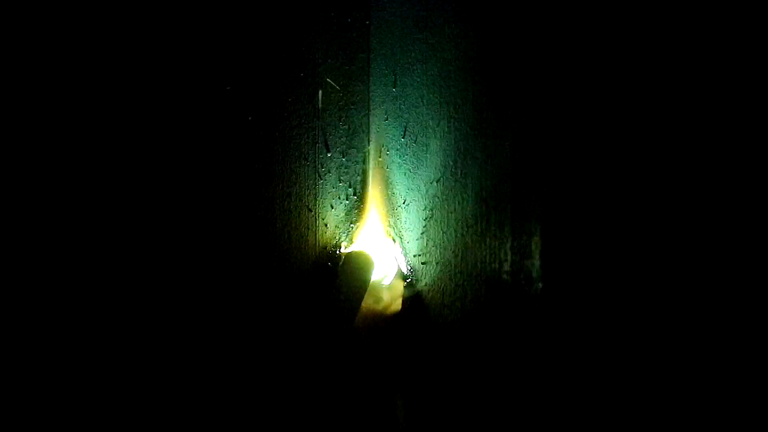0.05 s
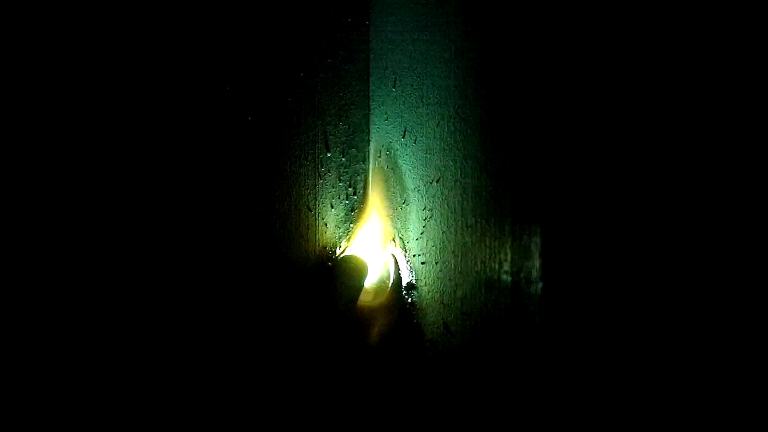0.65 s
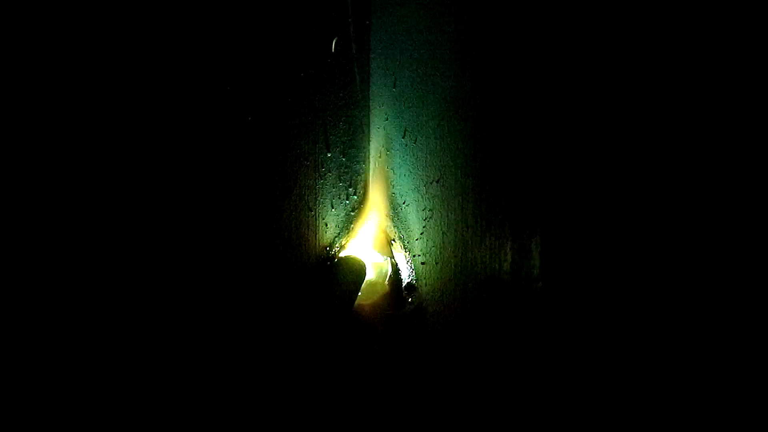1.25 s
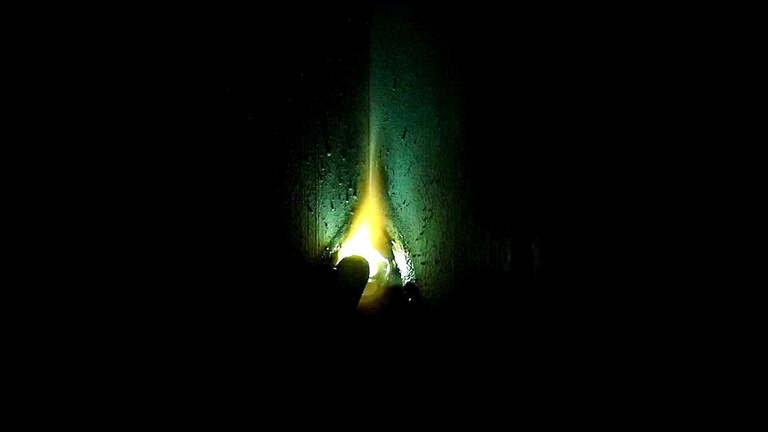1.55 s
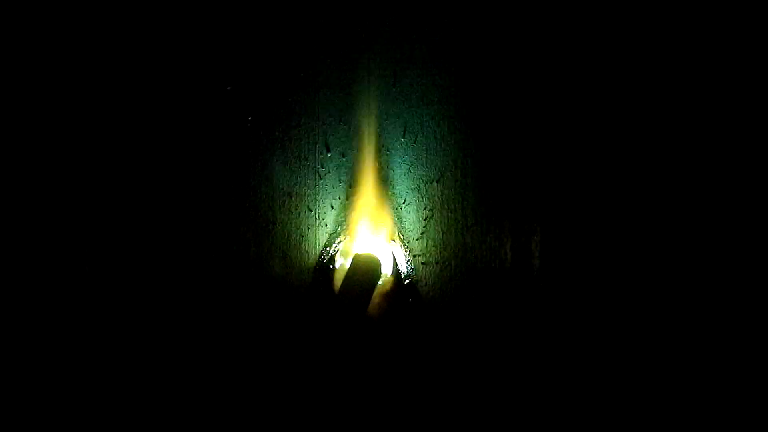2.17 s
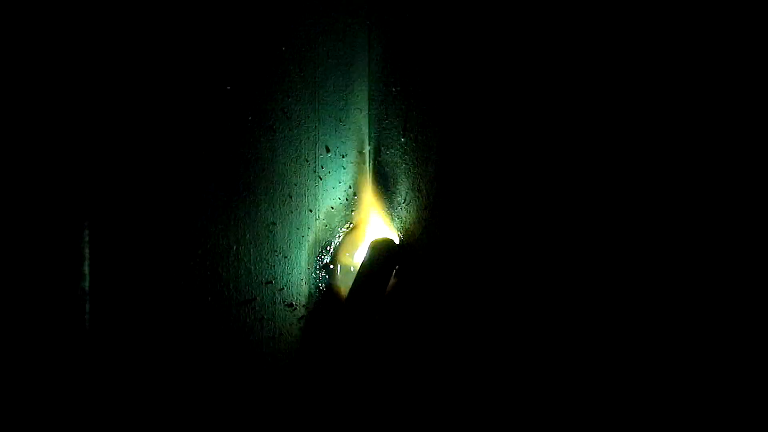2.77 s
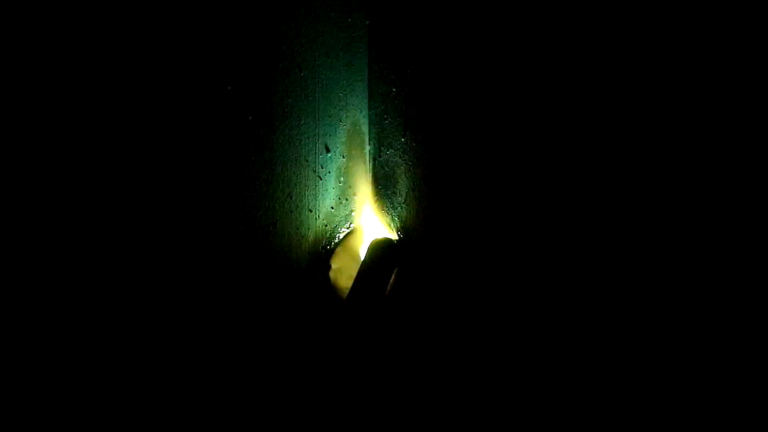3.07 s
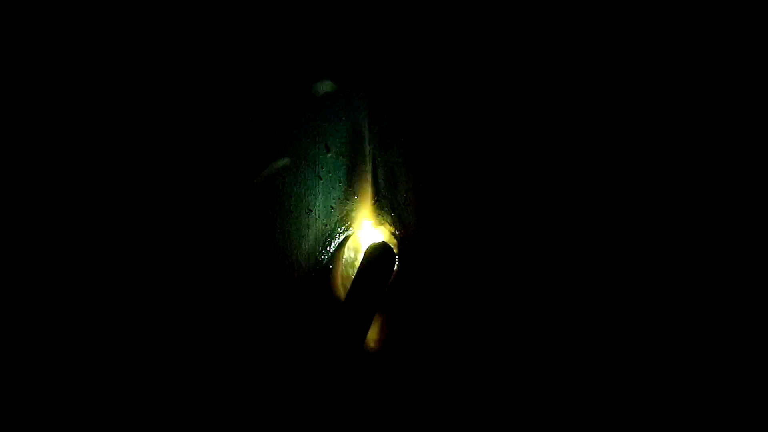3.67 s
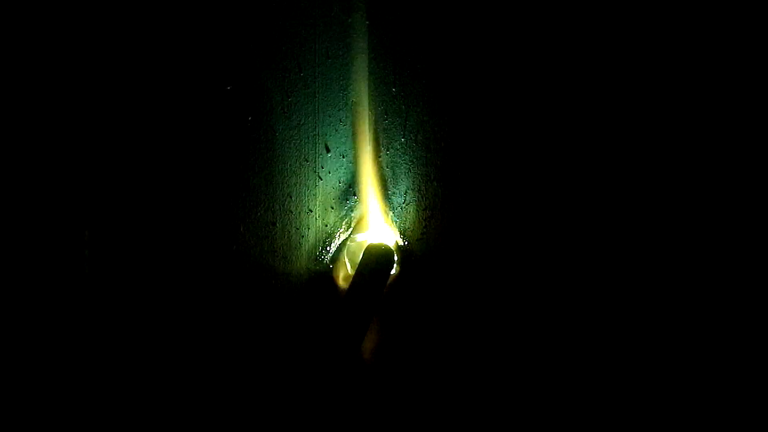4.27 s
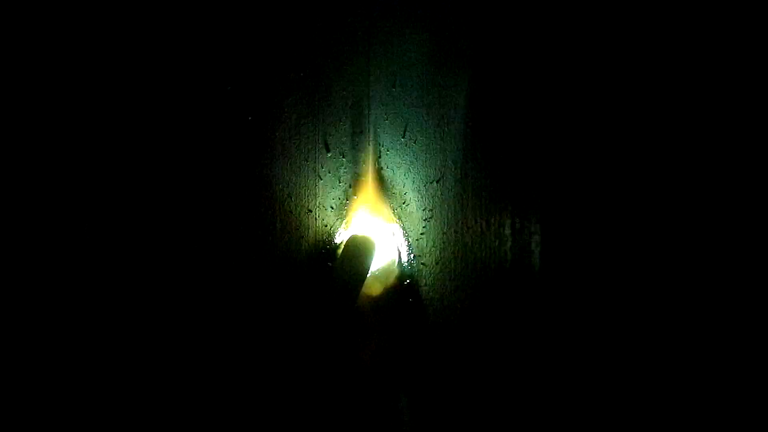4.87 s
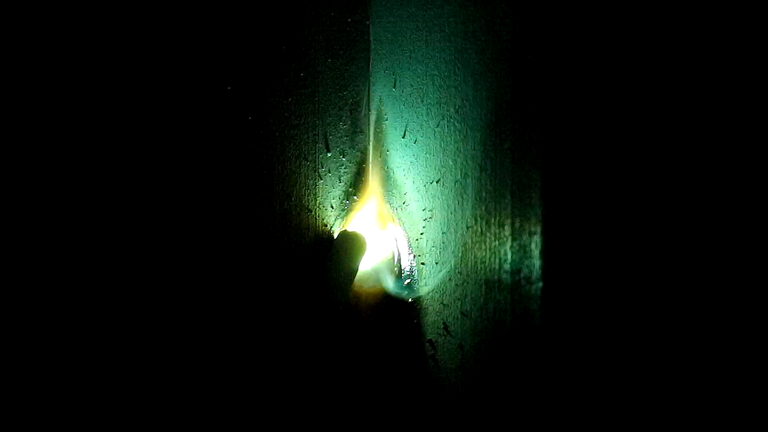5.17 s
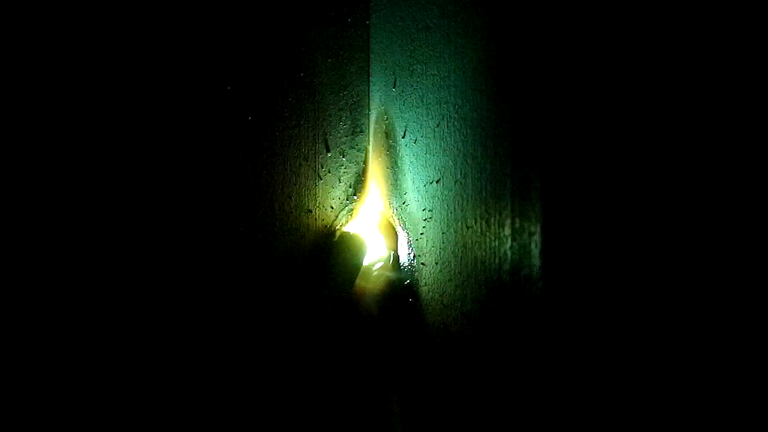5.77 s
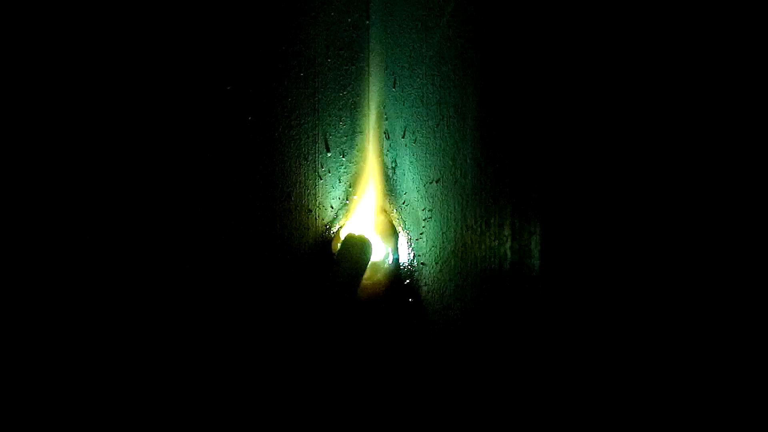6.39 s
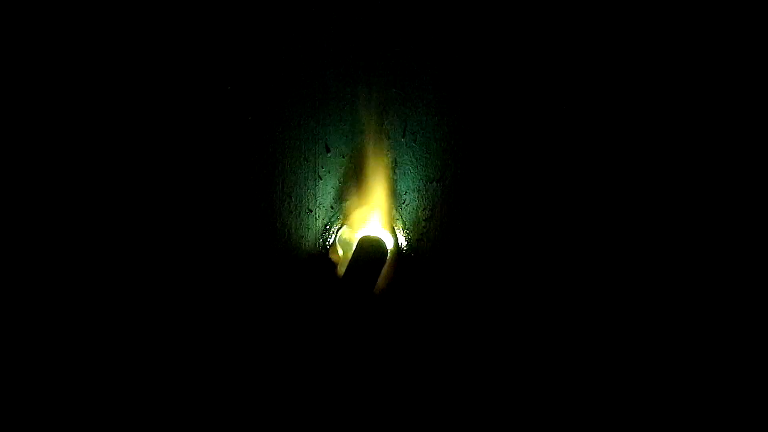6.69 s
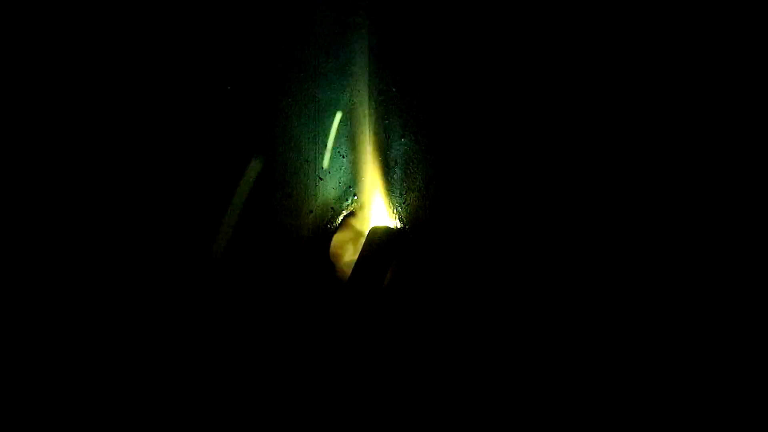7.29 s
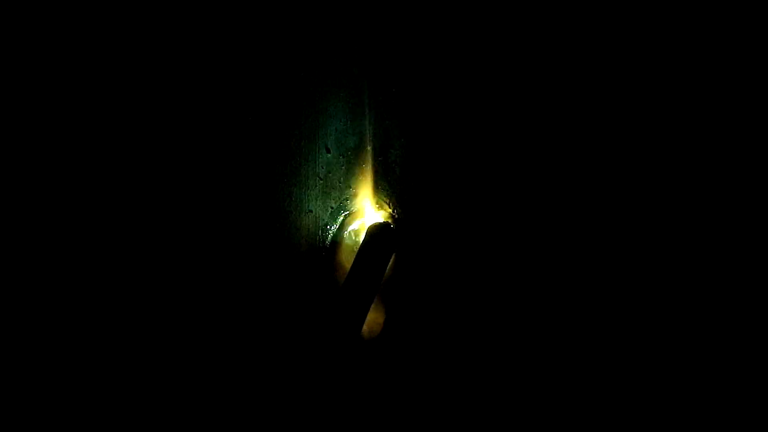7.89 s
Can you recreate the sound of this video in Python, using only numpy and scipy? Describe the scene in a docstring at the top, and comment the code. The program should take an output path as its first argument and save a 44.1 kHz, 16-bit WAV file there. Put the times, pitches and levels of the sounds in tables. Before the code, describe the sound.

Close, nearly dry workshop sound of an electric arc welding steel. A bright, grainy hiss runs without stopping, packed with quick uneven cracks, fizzing and tiny spatter clicks, with a wavering flame rumble underneath. A couple of soft pops lead to one loud pop, after which hiss and flutter sink for an instant. The crackling carries on with a few weaker pops and a last swell of flame.

```python
"""A stick welder runs a bead along a steel seam, close by, in a workshop.
From the start the arc hisses and its flame flutters; some ten times a second a drop of metal bridges
the gap, fizzes and snaps, while spatter ticks around the seam. From 1.6 s on, gas now and then bursts
from the molten pool with a dull pop. After the biggest pop, at 3.1 s, hiss and flutter duck briefly,
then return. Smaller pops follow, and the flame flares up again just before the end."""
import sys
import numpy as np
from scipy import signal
from scipy.fft import rfft, irfft
from scipy.io import wavfile
from scipy.ndimage import uniform_filter1d

SR = 44100
rng = np.random.default_rng(int(sys.argv[2]) if len(sys.argv) > 2 else 0)


def inscribe(sig):
    """Save sig as 16-bit PCM at rate SR to the path in sys.argv[1].

    A 1-D sig is mono; a 2-D sig holds one channel per row.
    Samples are clipped to [-1, 1] before scaling.
    """
    pcm = np.round(np.clip(np.atleast_2d(sig).T, -1, 1) * 32767)
    wavfile.write(sys.argv[1], SR, pcm.astype(np.int16))


N = 350154
TIME_S = np.arange(N) / SR
BAND_EDGE_HZ = 15850


# Drops crossing the arc. Each row: time in seconds, crack level in dB, crack length in seconds,
# level in dB that the arc builds towards before the drop.
DROPS = [(0.0858, -22, 0.0005, -42), (0.1786, -23, 0.0055, -28.5), (0.3369, -24, 0.0045, -35.5),
         (0.5135, -21, 0.0054, -34.5), (0.6487, -13, 0.0011, -36), (0.7338, -17, 0.0008, -37),
         (0.745, -23, 0.005, -31), (0.8639, -18, 0.0025, -38), (0.9154, -24, 0.0055, -39),
         (0.9887, -27, 0.004, -36.5), (1.0752, -18, 0.0017, -38.5), (1.227, -23, 0.0055, -33.5),
         (1.3518, -18, 0.0014, -38), (1.382, -25, 0.005, -34), (1.4583, -20, 0.002, -35),
         (1.5696, -12, 0.0006, -37.5), (1.6393, -15, 0.0018, -35.5), (1.7228, -16, 0.002, -32.5),
         (1.8073, -24, 0.0013, -37.5), (1.8782, -20, 0.0013, -31), (2.092, -29, 0.005, -35.5),
         (2.1537, -18, 0.0018, -34), (2.2901, -19, 0.0021, -35), (2.313, -29, 0.004, -33),
         (2.3995, -18, 0.002, -38.5), (2.5859, -16, 0.0016, -37.5), (2.6622, -24, 0.0027, -36),
         (2.7228, -21, 0.0029, -32), (2.755, -26, 0.005, -30), (2.8307, -21, 0.0019, -40),
         (3.048, -24, 0.005, -36.5), (3.1323, -9.5, 0.001, -35), (3.246, -19.5, 0.0004, -45),
         (3.263, -26, 0.002, -44), (3.3916, -12.5, 0.0011, -38.5), (3.594, -21, 0.0024, -35.5),
         (3.6443, -25, 0.0055, -30), (3.7796, -18, 0.0013, -37.5), (3.8603, -19.5, 0.002, -37.5),
         (3.892, -26.5, 0.005, -39), (4.0245, -16, 0.001, -41), (4.0715, -23, 0.004, -32.5),
         (4.1401, -18, 0.0008, -40.5), (4.2089, -16, 0.0019, -35), (4.2945, -19, 0.0016, -38.5),
         (4.3758, -9, 0.0006, -41), (4.526, -22, 0.0029, -35.5), (4.5817, -16, 0.0015, -31),
         (4.673, -11.5, 0.0008, -36), (4.7785, -16.5, 0.0016, -34.5), (4.898, -27, 0.005, -34),
         (5.0005, -14.5, 0.0016, -37.5), (5.0852, -16, 0.0005, -34), (5.2099, -21, 0.002, -36.5),
         (5.2322, -22, 0.0033, -35), (5.312, -25.5, 0.005, -34.5), (5.3649, -22, 0.0053, -30),
         (5.5529, -17, 0.004, -35), (5.6346, -21, 0.0019, -36.5), (5.7586, -15, 0.0007, -34.5),
         (5.767, -22, 0.005, -32), (5.8197, -21, 0.002, -33.5), (5.882, -14, 0.0015, -40.5),
         (6.0177, -21, 0.0055, -37.5), (6.1653, -15, 0.0016, -37), (6.2467, -18, 0.0011, -36),
         (6.295, -27, 0.0055, -35), (6.3201, -26, 0.004, -35), (6.4507, -17, 0.0014, -41),
         (6.554, -19, 0.002, -35.5), (6.6064, -17, 0.0017, -34), (6.7259, -14.5, 0.0018, -40),
         (6.781, -26, 0.003, -37), (6.832, -17, 0.0007, -38), (6.96, -28, 0.005, -39.5),
         (7.0186, -20, 0.0028, -31.5), (7.1297, -19, 0.002, -36), (7.195, -27, 0.005, -37),
         (7.319, -20, 0.0022, -37.5), (7.3935, -18, 0.0018, -34), (7.5882, -23, 0.0045, -37.5),
         (7.7279, -13, 0.0005, -36), (7.9128, -22, 0.004, -34)]

def arc_level_db(idle_db=-58, sag_share=0.38, settle_s=0.008, touch_db=2, touch_s=0.01, duck_db=8):
    """The arc builds while a drop grows, swells as it touches the pool and sags once it is gone."""
    drop_s, _, length_s, top_db = np.transpose(DROPS)
    growing, sag = drop_cycle()
    built_db = top_db[growing] + sag_share * sag * (idle_db - top_db[growing])
    built_db = uniform_filter1d(built_db, int(settle_s * SR))
    nearest = np.searchsorted((drop_s[1:] + drop_s[:-1]) / 2, TIME_S)
    slowness = length_s[nearest] / np.median(length_s)
    swell_db = touch_db * np.sqrt(slowness) * bump(drop_s[nearest], touch_s)
    return built_db + swell_db - duck_db * duck()


def drop_cycle(regrow_s=0.072):
    """Per sample: row of the growing drop, and the sag (1 to 0) left by the one before."""
    drop_s = np.array(DROPS)[:, 0]
    growing = np.searchsorted(drop_s, TIME_S)
    age_s = TIME_S - np.r_[0, drop_s][growing]
    return np.minimum(growing, len(drop_s) - 1), np.exp(-(age_s / regrow_s) ** 2)


# Arc hiss. Each row: frequency in Hz, relative level in dB.
HISS_SPECTRUM = [(80, -59.5), (400, -6), (1200, -9), (2800, -8.5), (4600, -8.5), (9000, -21.5),
                 (15500, -16.5)]

def hiss(arc_db, gain_db=5, spurt_db=1.5, swell_db=1.17, grain_db=0.77, detune=0.013):
    """The burning arc surges and breaks off, grainy from tiny sparks; its sway shifts the resonances."""
    surge_db = spurt_db * surges(per_s=52, build_s=0.011) + swell_db * surges(per_s=7.7, build_s=0.058)
    envelope = gain_of(arc_db + gain_db + surge_db + grain_db * wander(rate_hz=1500))
    sway = (1 + np.tanh(2 * wander(rate_hz=5))) / 2
    higher = radiate(envelope * np.sqrt(sway), HISS_SPECTRUM, 1 + detune)
    lower = radiate(envelope * np.sqrt(1 - sway), HISS_SPECTRUM, 1 - detune)
    return higher + lower


# A drop's crack and fizz. Each row: frequency in Hz, relative level in dB.
CRACK_SPECTRUM = [(100, -7), (500, -3.5), (1200, -6), (2800, -7), (4600, 6), (9000, -5), (15500, 6.5)]
FIZZ_SPECTRUM = [(100, -43), (1200, -14.5), (4000, -19.5), (9000, -21), (15500, -25.5)]

def crackle(arc_db, crack_db=-0.9, fizz_db=-10, fry_db=-14.5, sizzle_db=-44, sputter_db=2, grain_db=1.3):
    """A drop fizzes as its neck thins, cracks as it blows, then fries; spatter spits as it lands."""
    fizz_rise_s, fizz_fade_s, fry_s, spit_s = 0.008, 0.002, 0.009, 0.0007
    crack_power, fizz_power, fry_power = np.zeros((3, N))
    median_length_s = np.median(np.array(DROPS)[:, 2])
    spits = [(at_s, level_db, spit_s) for at_s, level_db in TICKS]
    for at_s, level_db, length_s, *_ in list(DROPS) + spits:
        near = slice(int((at_s - 0.05) * SR), int((at_s + 0.05) * SR))
        before_s, after_s = np.maximum(at_s - TIME_S[near], 0), np.maximum(TIME_S[near] - at_s, 0)
        rise_s = 0.65 * length_s
        crack = gain_of(level_db + crack_db) * np.exp(-(before_s / rise_s) ** 2 - after_s / length_s)
        fizz = gain_of(level_db + fizz_db) * np.exp(-before_s / fizz_rise_s - after_s / fizz_fade_s)
        fry = gain_of(level_db + fry_db) * np.exp(-after_s / fry_s) * (after_s > 0)
        slowness = length_s / median_length_s
        crack_power[near] += crack ** 2
        fizz_power[near] += min(slowness, slowness ** 2) * fizz ** 2
        fry_power[near] += min(slowness, 1) * fry ** 2
    # Between drops a sizzle follows the arc's strength.
    fizz_power += gain_of(sizzle_db + 0.91 * (arc_db - arc_db.mean())) ** 2
    grain = unit_rms(gain_of(grain_db * wander(rate_hz=5000)))
    sputter = unit_rms(gain_of(sputter_db * wander(rate_hz=350)))
    cracks = radiate(np.sqrt(crack_power + fry_power * sputter ** 2) * grain, CRACK_SPECTRUM)
    return cracks + radiate(np.sqrt(fizz_power) * sputter * grain, FIZZ_SPECTRUM)


# Spatter landing. Each row: time in seconds, level in dB.
TICKS = [(0.6535, -15), (1.567, -19), (2.409, -15), (3.1305, -12), (3.386, -17.5), (4.1462, -20),
         (5.091, -19), (6.1602, -16), (6.171, -14), (6.2522, -18.5), (6.7477, -19), (6.8399, -17),
         (7.3267, -19), (7.9019, -16)]
# One tick. Each row: frequency in Hz, relative level in dB.
TICK_SPECTRUM = [(100, -28), (1200, -7), (2800, -8), (5000, 8), (9000, -1), (12500, -6), (15500, 1)]

def spatter(arc_db, snap_db=4, tick_db=7, spark_db=2, sparks_per_s=170, size=512):
    """Dry clicks, each with its own colour: the snap of a short crack, landing spatter, tiny sparks."""
    spread_db, variety_db, sharp_s = 2.5, 3, 0.001
    spark_at = np.flatnonzero(rng.random(N) < sparks_per_s / SR)
    excess_db = spread_db * np.minimum(rng.exponential(1, len(spark_at)), 2)
    sparks = list(zip(spark_at / SR, arc_db[spark_at] + spark_db + excess_db))
    snaps = [(at_s, level_db + snap_db - 10 * np.log10(1 + (length_s / sharp_s) ** 2))
             for at_s, level_db, length_s, _ in DROPS]
    ticks = [(at_s, level_db + tick_db) for at_s, level_db in TICKS]
    events = snaps + ticks + sparks
    hz = np.fft.rfftfreq(size, 1 / SR)
    # Three random colours per click: left, right, shared.
    colours = unit_rms(uniform_filter1d(rng.standard_normal((len(events), 3, len(hz))), size=12))
    colour_db = variety_db * (colours[:, :2] + colours[:, 2:]) / np.sqrt(2)
    clicks = irfft(minimum_phase(at_hz(TICK_SPECTRUM, hz) + resonances_db(hz) + colour_db))
    track = np.zeros((2, N + size))
    for (at_s, level_db), click in zip(events, clicks):
        start = int(at_s * SR)
        track[:, start:start + size] += gain_of(level_db) * unit_rms(click) / np.sqrt(size)
    return track[:, :N]


# Gas bursts. Each row: start in seconds, level in dB, push length in seconds, thud cutoff in Hz.
POPS = [(1.638, -19.5, 0.00089, 2600), (2.4093, -12, 0.00051, 2600), (2.4147, -16, 0.00046, 2200),
        (3.1354, 3, 0.00046, 2530), (3.16, -18, 0.00035, 2400), (3.1651, -5, 0.00044, 750),
        (3.171, -18, 0.00024, 1400), (5, -12, 0.00034, 2000), (5.551, -21.5, 0.0018, 2000),
        (6.16, -25, 0.00099, 2200)]
# The pool's burble. Each row: frequency in Hz, relative level in dB.
BURBLE_SPECTRUM = [(60, -11), (300, -6), (700, -11), (1700, -7.5), (3200, -23), (12000, -28)]

def pops(highpass_hz=65, spray_db=-25, spray_s=0.0074, burble_db=-20, burble_s=0.0086):
    """Gas bursts with a hard push and a longer suck; the pool burbles. Sharper pops spray more metal."""
    blast, spray, burble = np.zeros((3, N))
    dullest_hz, sharpest_hz = np.sort(np.array(POPS)[:, 3])[[0, -1]]
    for start_s, level_db, push_s, cutoff_hz in POPS:
        near = slice(int(start_s * SR), int(start_s * SR) + SR // 10)
        t = TIME_S[near] - TIME_S[near][0]
        level = gain_of(level_db)
        pressure = level * (1 - t / push_s) * np.exp(-t / push_s)
        blast[near] += signal.lfilter(*signal.butter(2, cutoff_hz, fs=SR), pressure)
        spray[near] += level * gain_of(spray_db) * cutoff_hz / sharpest_hz * np.exp(-t / spray_s)
        dullness = np.sqrt(dullest_hz / cutoff_hz)
        burble[near] += level * gain_of(burble_db) * dullness * np.exp(-t / burble_s)
    thud = signal.sosfilt(signal.butter(2, highpass_hz, "high", fs=SR, output="sos"), blast)
    return thud + radiate(spray, HISS_SPECTRUM) + radiate(burble, BURBLE_SPECTRUM)


def duck(delay_s=0.061, half_s=0.015, growth=0.46):
    """How far hiss and flutter dip just after a pop (1 for a 0 dB pop); the deepest dip counts."""
    dips = [gain_of(growth * level_db) * bump(at_s + delay_s, half_s) for at_s, level_db, *_ in POPS]
    return np.max(dips, axis=0)


# Slow drift of the flame. Each row: time in seconds, level in dB.
FLAME_DRIFT = [(0.0, -47), (0.3, -43.5), (0.75, -48), (1.3, -39), (1.7, -45), (2.1, -44.5), (2.5, -46.5),
               (3.0, -38.5), (3.5, -46.5), (3.95, -51), (4.55, -44.5), (5.2, -38.5), (5.7, -48.5),
               (6.35, -45.5), (6.8, -42.5), (7.55, -39.5), (7.8, -37.5), (7.93, -50)]
# Flares and lulls. Each row: centre in seconds, rise in dB (negative: lull), half length in seconds.
FLARES = [(0.072, 12, 0.031), (0.205, 6, 0.018), (0.69, -6, 0.055), (0.95, 4, 0.023), (1.007, -11, 0.024),
          (1.09, 6.5, 0.017), (1.19, 9, 0.014), (1.89, 8, 0.079), (2.245, 7.5, 0.046), (3.367, 8, 0.047),
          (3.751, 9, 0.024), (4.772, 9, 0.013), (4.98, 4, 0.052), (5.65, -3, 0.052), (5.725, 7.5, 0.012),
          (6.16, 11, 0.03), (6.47, 7, 0.047), (6.878, -20, 0.02), (6.984, 7, 0.022), (7.274, 7, 0.026),
          (7.442, 7.5, 0.03), (7.68, 8, 0.072)]
# The flame's flutter and rumble. Each row: frequency in Hz, relative level in dB.
FLUTTER_SPECTRUM = [(40, -58), (150, -19.5), (330, -0.5), (550, 1.5), (900, -6), (1500, -7.5), (4000, -34)]
RUMBLE_SPECTRUM = [(25, -32), (65, -22), (120, -6.5), (210, 0), (330, -3.5), (1200, -37.5)]

def flame(flutter_db=-1, rumble_db=-51, rumble_growth=1.455, lumps_db=2, sag_db=1, duck_db=24):
    """Hot gas flutters around the arc and sinks after each drop; in a flare the rumble grows most."""
    level_db = np.interp(TIME_S, *np.transpose(FLAME_DRIFT))
    level_db += sum(rise_db * bump(at_s, half_s) for at_s, rise_db, half_s in FLARES)
    _, sag = drop_cycle()
    level_db -= sag_db * sag + duck_db * duck()
    level_db += lumps_db * wander(rate_hz=35)
    rumble = radiate(gain_of(rumble_db + rumble_growth * (level_db - level_db.mean())), RUMBLE_SPECTRUM)
    return radiate(gain_of(level_db + flutter_db), FLUTTER_SPECTRUM) + rumble


# Resonances of the steel on its bench, and of the space between steel and microphone.
# Each row: centre in Hz, width in Hz, left gain in dB, right gain in dB.
BENCH_MODES = [(405, 150, 3, 4.5), (614, 20, 4, 4), (798, 35, 4, 2.5), (932, 70, 8, 5)]
CAVITY_MODES = [(2410, 120, 3.5, 3.5), (3260, 300, 6.5, 4.5), (3900, 900, 4, 3.5), (4720, 250, -3, -4),
                (5220, 440, 9.5, 2.5), (5900, 700, 8, 4.5), (7000, 640, 12.5, 13), (7900, 280, 10.5, 7),
                (8770, 800, 11.5, 13.5), (9790, 750, 11, 7), (10660, 700, 10, 4), (11880, 780, 1.5, 11),
                (12800, 750, 4, 7), (13560, 750, 0.5, 9)]

def resonances_db(hz):
    """Left and right gain of the steel and the space around it."""
    return sum(np.array([[left_db], [right_db]]) / (1 + (2 * (hz - centre_hz) / width_hz) ** 2)
               for centre_hz, width_hz, left_db, right_db in list(BENCH_MODES) + list(CAVITY_MODES))


# Likeness of the two microphone ports. Each row: frequency in Hz, coherence from 0 to 1.
PORT_COHERENCE = [(30, 0.98), (80, 0.88), (450, 0.53), (1300, 0.02), (2400, 0.77), (7000, 0.58),
                  (15000, 0.13)]
# Phase between the ports. Each row: frequency in Hz, lead of the left in radians.
PORT_LEAD = [(2400, 0.0), (3300, 1.0), (5100, 1.3), (6100, -0.1), (7600, 0.4), (8800, 1.4), (11700, 0.9),
             (12500, 0.1), (13300, -2.8), (14500, -2.7), (15500, 2.2)]
# Its spectrum is a constant, fine random ripple that gives the noise a faint ring.
COLOUR_RIPPLE = rng.standard_normal(1500) * (TIME_S[:1500] > 0.007) * np.exp(-TIME_S[:1500] / 0.015)

def radiate(envelope, spectrum, tuning=1, ripple_db=1.7, size=4096):
    """Turbulent noise reaches both ports through the resonances, partly direct, partly scattered."""
    hz = np.fft.rfftfreq(size, 1 / SR)
    peaks_db = resonances_db(hz / tuning)
    ring_db = ripple_db * unit_rms(rfft(COLOUR_RIPPLE, size).real)
    colour = minimum_phase(at_hz(spectrum, hz) + peaks_db + ring_db)
    colour /= np.sqrt(np.mean(abs(colour) ** 2 * (hz < BAND_EDGE_HZ)))
    # The ports agree best where one resonance stands out.
    prominence_db = (peaks_db - uniform_filter1d(peaks_db, size=150)).mean(0)
    coherence = np.clip(at_hz(PORT_COHERENCE, hz) + 0.06 * prominence_db, 0, 1)
    phase_shift = np.exp(1j * np.outer([0, -1], at_hz(PORT_LEAD, hz)))
    direct = (np.sqrt(coherence) * phase_shift, np.tile(rng.standard_normal(N), (2, 1)))
    scattered = (np.sqrt(1 - coherence), rng.standard_normal((2, N)))
    ports = np.zeros((2, N))
    for share, noise in (direct, scattered):
        response = np.roll(irfft(colour * share), size // 2, axis=1)
        ports += signal.oaconvolve(noise * envelope, response, "same", axes=1)
    return ports


# Room decay. Each row: frequency in Hz, time to fall 60 dB in seconds.
ROOM_T60 = [(150, 0.078), (3000, 0.065), (15000, 0.0056)]

def workshop(sound, predelay_s=0.004, size=256):
    """Dense reflections from the walls, the treble dying first."""
    reflections = rng.standard_normal((2, SR // 2)) * (TIME_S[:SR // 2] > predelay_s)
    hz, t, bands = signal.stft(reflections, SR, nperseg=size)
    decay = gain_of(-60 * t / at_hz(ROOM_T60, hz)[:, None])
    _, tail = signal.istft(bands * decay, SR, nperseg=size)
    return signal.fftconvolve(sound, tail / np.linalg.norm(tail[0]), axes=1)[:, :N]


def surges(per_s, build_s):
    """Ramps that build up and collapse at random moments; mean 0, rms 1."""
    collapses = 1.0 * (rng.random(N) < per_s / SR)
    ramps = signal.lfilter([1], [1, -np.exp(-1 / (build_s * SR))], collapses)[::-1]
    return unit_rms(ramps - ramps.mean())


def wander(rate_hz):
    """Smooth random curve of rms 1, rolling off above the rate."""
    hz = np.fft.rfftfreq(N, 1 / SR)
    return unit_rms(irfft(rfft(rng.standard_normal(N)) * np.exp(-(hz / rate_hz) ** 2), N))


def bump(centre_s, half_s):
    """Gaussian swell of height 1."""
    return np.exp(-np.minimum(abs(TIME_S - centre_s) / half_s, 6) ** 2)


def minimum_phase(db):
    """Frequency response with the given gain that rings only after a click."""
    log_gain = np.log(gain_of(np.concatenate([db, db[..., -2:0:-1]], axis=-1)))
    return np.exp(np.conj(signal.hilbert(log_gain)))[..., :db.shape[-1]]


def at_hz(table, hz):
    """Interpolates a table on a log-frequency axis."""
    table_hz, values = np.transpose(table)
    return np.interp(np.log(hz + 1), np.log(table_hz + 1), values)


def gain_of(db):
    return 10 ** (np.asarray(db) / 20)


def unit_rms(x):
    return x / np.sqrt(np.mean(x ** 2) + 1e-20)


def scene(room_db=-21, pan_db=0.2):
    """The weld close by, slightly to the right, with a little of the room."""
    arc_db = arc_level_db()
    weld = hiss(arc_db) + crackle(arc_db) + spatter(arc_db) + flame() + pops()
    return (weld + gain_of(room_db) * workshop(weld)) * gain_of([[-pan_db], [pan_db]])


def record(dry):
    """Rounds off the highest peaks and limits the band."""
    ceiling = 0.65
    rounded = ceiling * np.tanh(dry / ceiling)
    lowpass = signal.firwin(401, BAND_EDGE_HZ, window=("kaiser", 9), fs=SR)
    return signal.oaconvolve(rounded, lowpass[None], "same")


dry = scene()
out = record(dry)
inscribe(out)
```